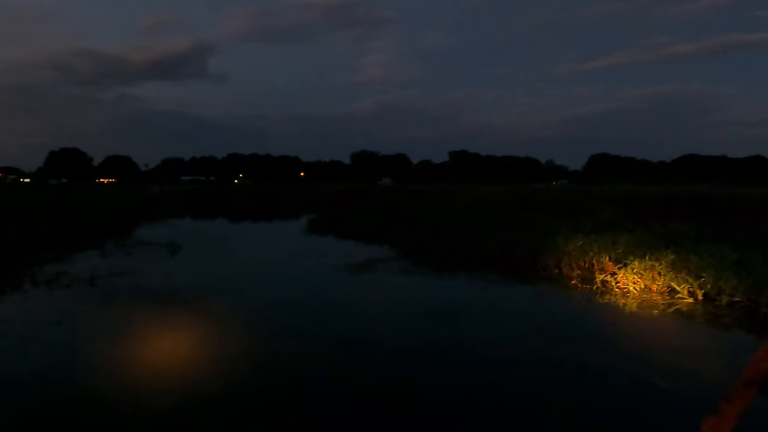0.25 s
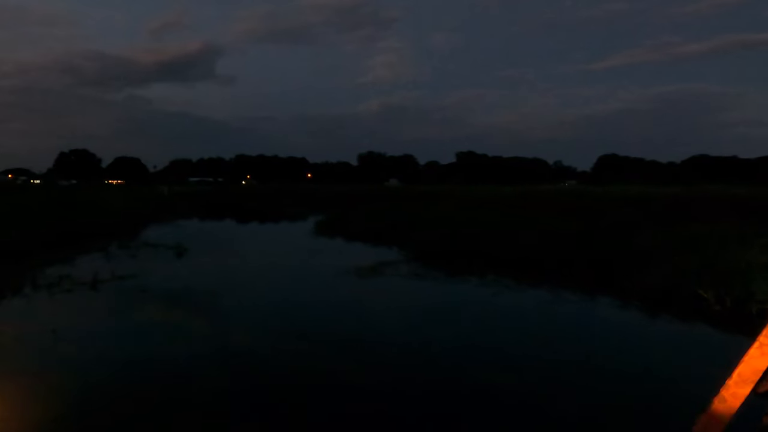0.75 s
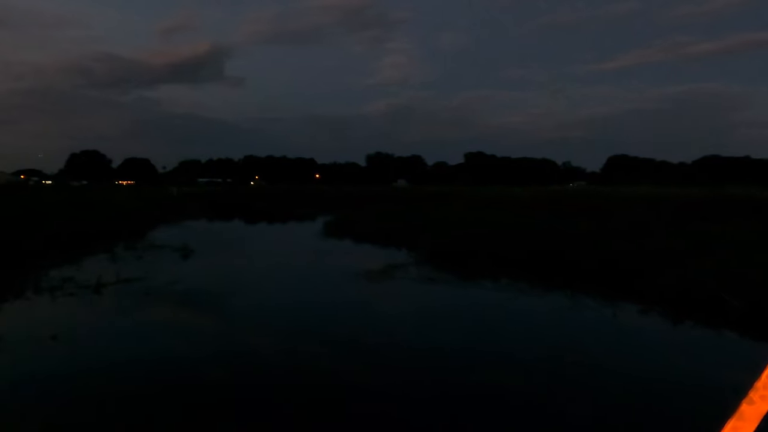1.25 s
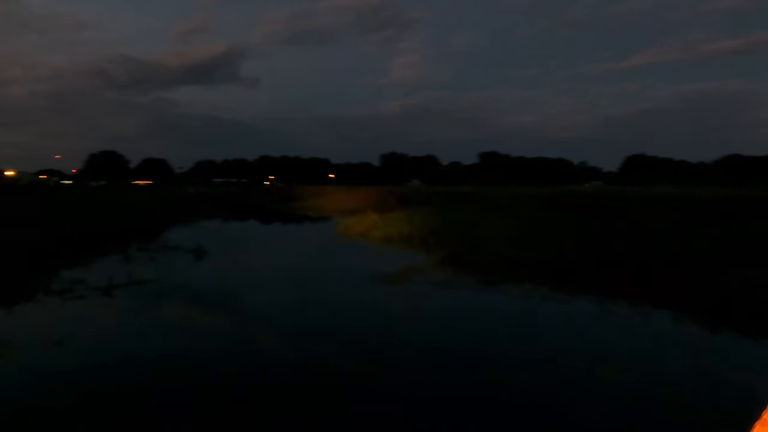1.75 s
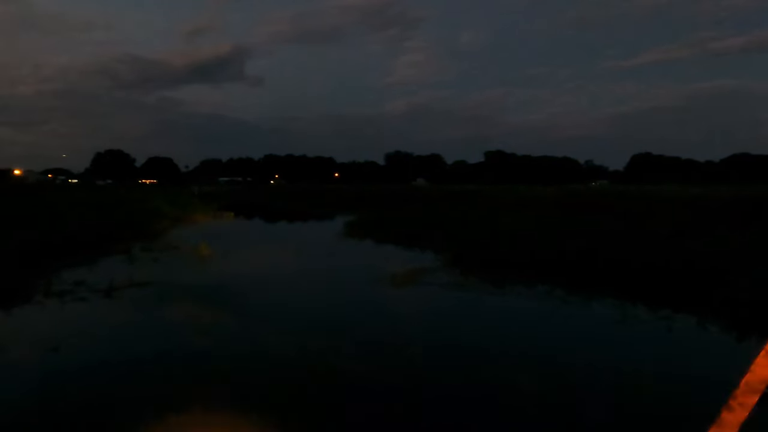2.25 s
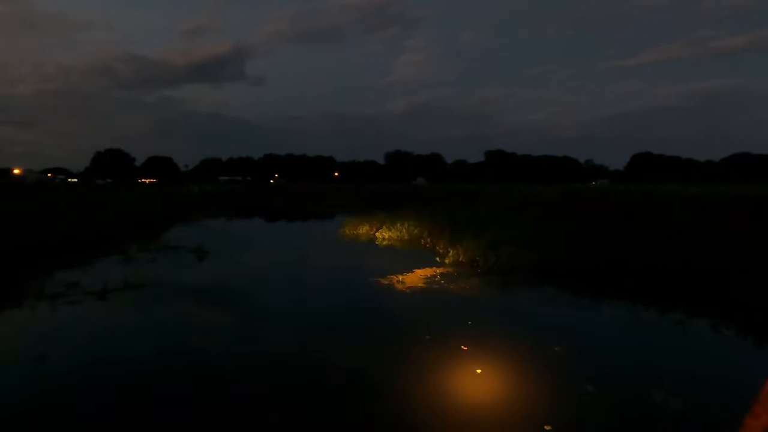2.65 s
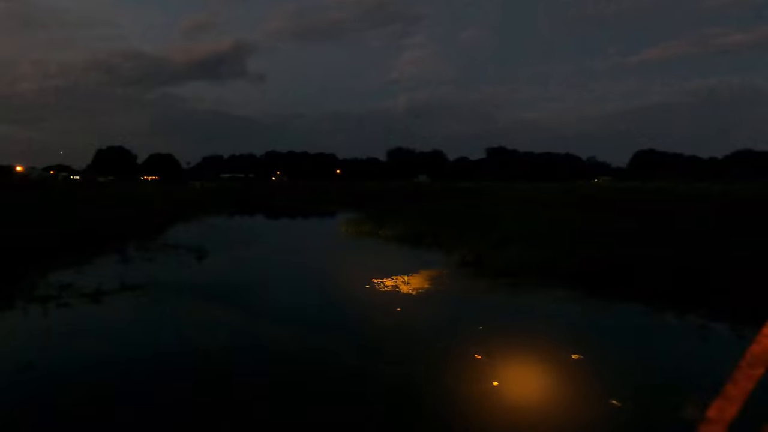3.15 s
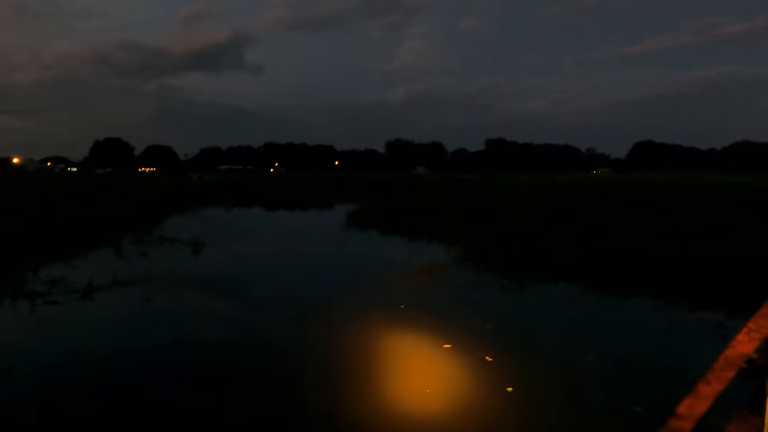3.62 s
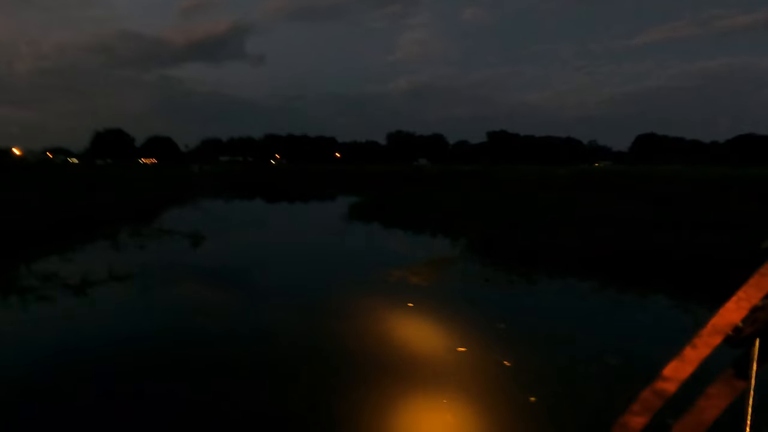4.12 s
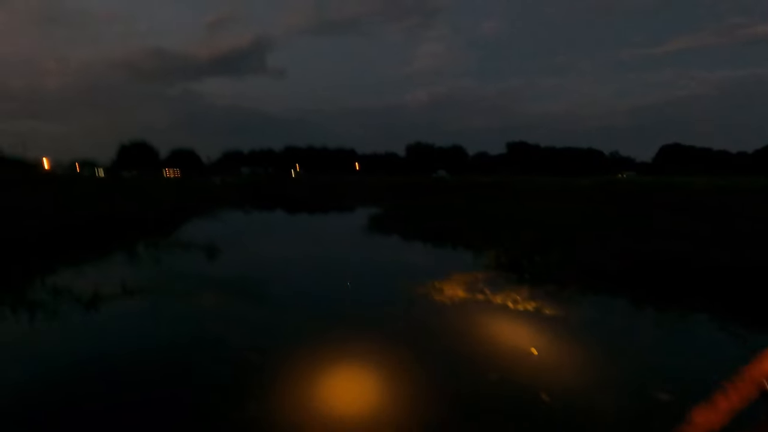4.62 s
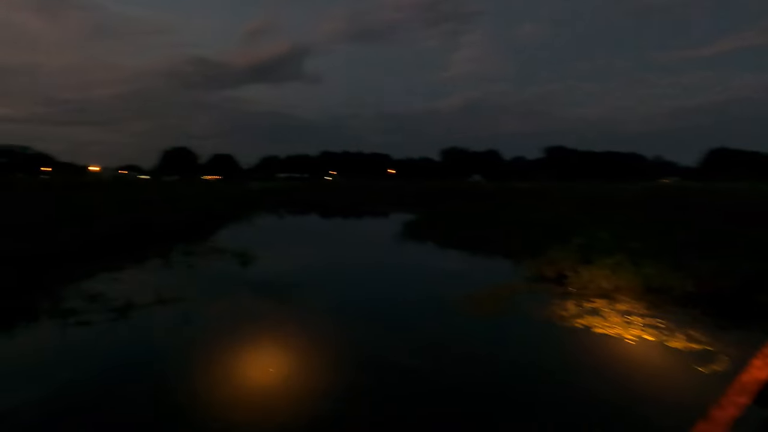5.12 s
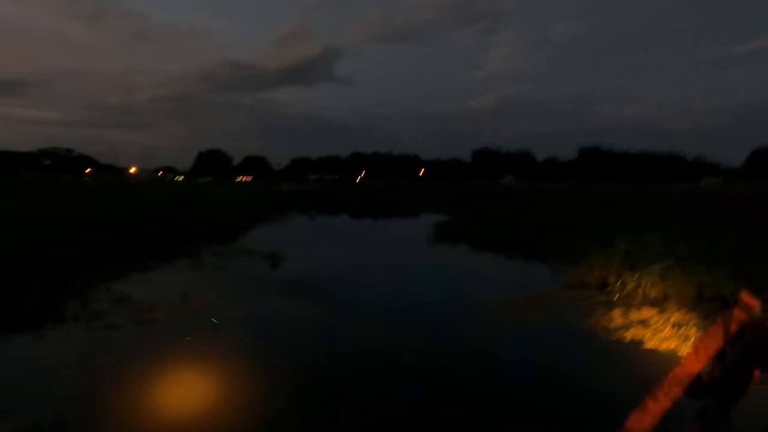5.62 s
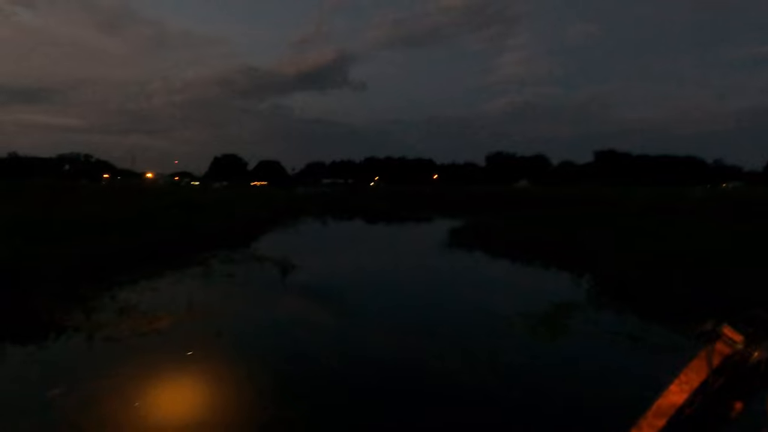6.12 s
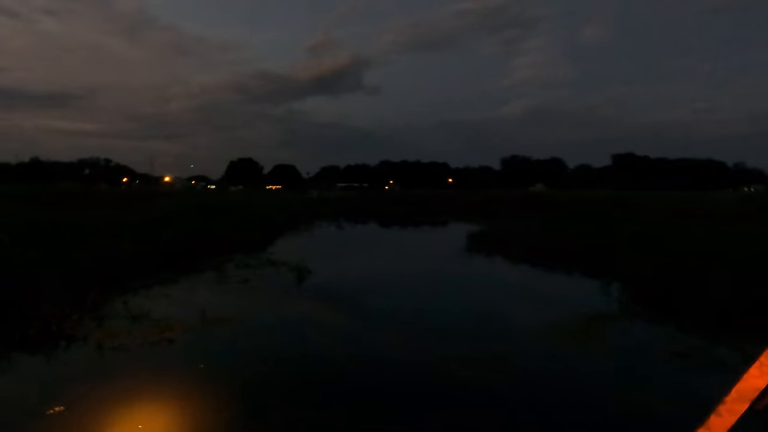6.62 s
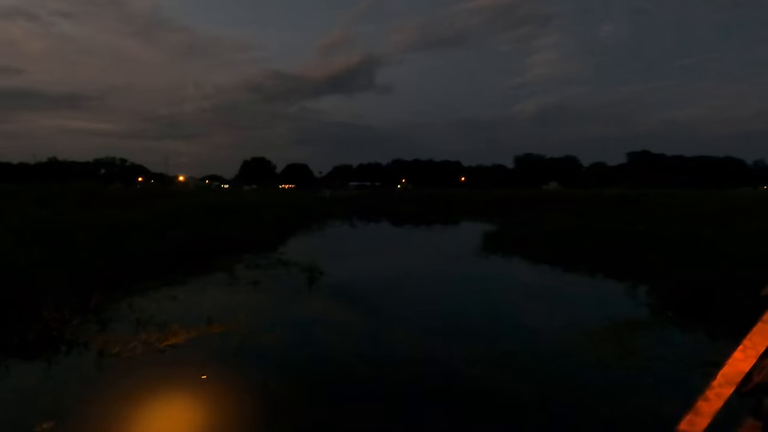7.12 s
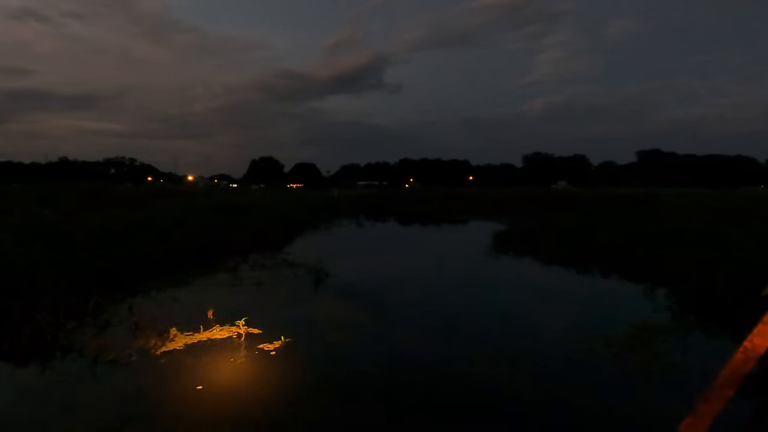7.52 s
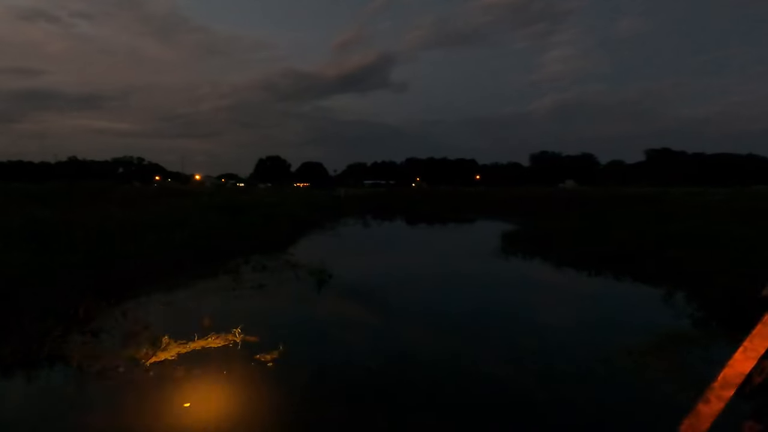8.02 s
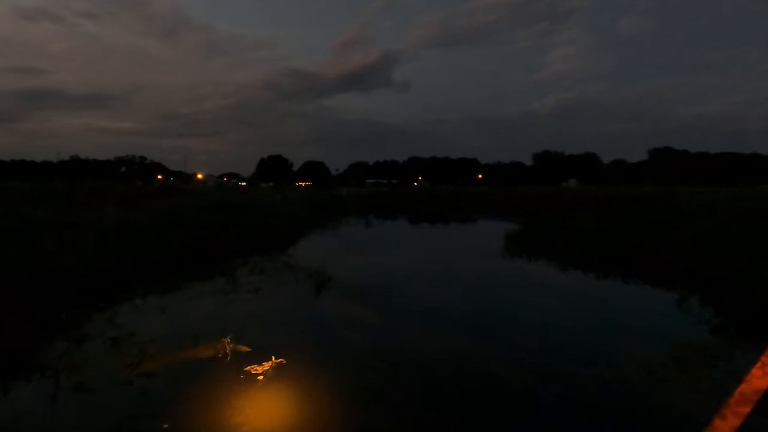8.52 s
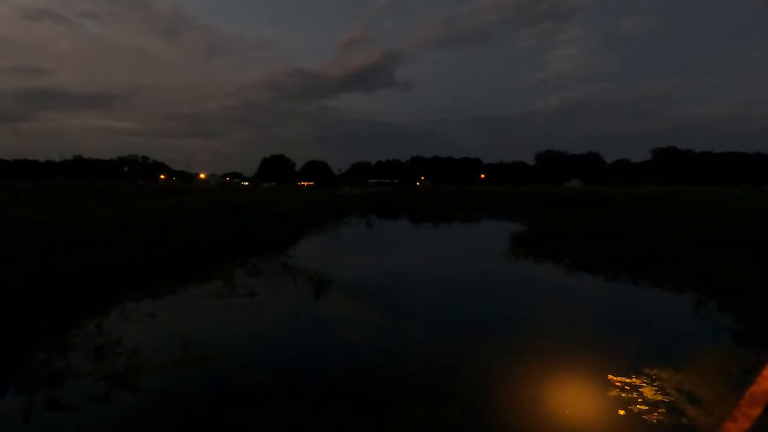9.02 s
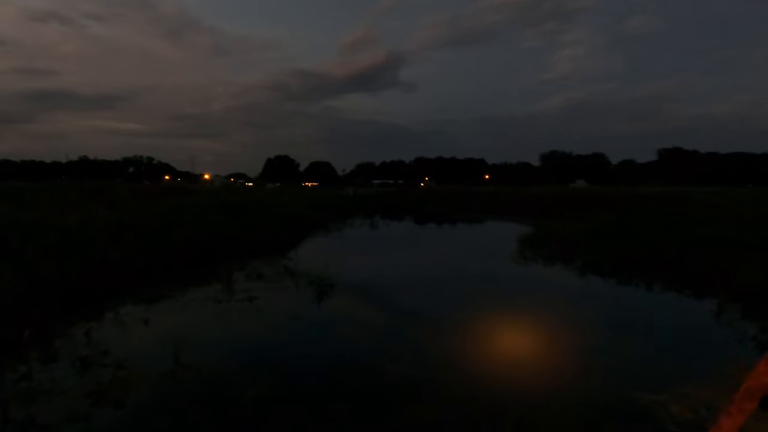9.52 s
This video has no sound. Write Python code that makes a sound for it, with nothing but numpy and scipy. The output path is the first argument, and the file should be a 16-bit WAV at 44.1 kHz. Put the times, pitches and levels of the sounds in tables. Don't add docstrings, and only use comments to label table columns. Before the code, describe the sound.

Deep steady V-eight boat engine drone over open water at dusk, hull ringing and rattling, soft water wash and faint shrill insects.

```python
import sys
import numpy as np
from scipy import signal
from scipy.fft import rfft, irfft, next_fast_len
from scipy.io import wavfile
from scipy.ndimage import uniform_filter1d

SR = 44100
rng = np.random.default_rng(int(sys.argv[2]) if len(sys.argv) > 2 else 0)


def undo_db(level):
    steps = np.asarray(level, float) / 20
    return 10 ** steps


def waveform_to_disk(signal):
    frames = np.transpose(np.atleast_2d(signal))
    scaled = np.clip(frames, -1, 1) * 32767
    samples = np.round(scaled).astype(np.int16)
    wavfile.write(sys.argv[1], SR, samples)


N = 429975
USUAL_RATE = 43.5

# (time [s], rate [firings per second])
ENGINE_SPEED = [(0.0, 44.19), (0.92, 43.89), (1.22, 44.29), (1.36, 43.87), (2.66, 43.44), (2.8, 43.49),
                (3.65, 42.05), (4.09, 43.15), (4.77, 43.7), (5.6, 43.56), (5.74, 42.95), (6.36, 42.65),
                (6.97, 43.83), (7.81, 43.17), (7.91, 43.94), (8.84, 42.86), (8.96, 43.39), (9.75, 43.48)]
# (strength [dB], travel down the header [ms])
CYLINDERS = [(0.7, 6.4), (-1.0, -0.13), (0.1, 8.63), (-1.1, 5.73), (-1.3, 7.09), (5.9, 7.72), (-4.8, 5.94),
             (1.5, 7.6)]
# (pitch [Hz], width [Hz], gain [signed])
PIPES = [(69.06, 5, -.047), (105.7, 26.4, -.336), (114.55, 27.7, .371)]
THROB = [(1, .168), (2, -.147)]
# (time [s], strength [dB])
STUMBLES = [
    (1.70, -6),
    (3.55, -10),
    (3.575, -7),
    (5.2, -4),
    (7.50, -6),
]
# (pitch [multiple of engine cycle], level [dB rms])
ROCKING = [(2, -54), (3, -48), (4, -52), (5, -43), (6, -47), (10, -47), (25, -50), (26, -52), (32, -52)]
# (pitch [multiple of engine cycle], level [dB rms], wobble [share], gain [dB per extra firing a second])
GEARS = [(35.4, -60.5, 0.11, -1), (39.95, -56.5, 0.2, -3), (41.97, -57, 0.93, 3),
         (48.24, -57.5, 0.22, -0.5), (50.04, -41, .16, 7), (55.54, -54, 0.45, -1), (66.3, -56.5, 0.47, 4),
         (68.15, -50, 0.99, 0.5), (69.86, -49, 0.46, 9), (88.6, -62, 0.55, -2.5), (100.2, -58, 0.61, -7),
         (101, -60.5, 0.93, -9), (110.2, -60.5, 0.24, 3), (116.7, -59.5, 0.24, 11.5),
         (149.3, -63.5, 0.32, 8), (158.8, -59, 0.14, 10.5), (194, -67.5, 0.24, -5), (243.5, -73, .3, -2),
         (338.4, -73, .3, -3.5)]
GEAR_LOAD = [(1, .25, .03), (.25, .3, .92)]
# (pitch [Hz], level [dB per Hz])
ROAR_COLOUR = [(82, -24.5), (140, -6), (183, -21.5), (280, -13), (435, -21), (592, -22), (717, -23.5),
               (852, -24), (957, -32.5), (3340, -47.5), (6920, -61), (11000, -84.5), (13800, -87)]
# (pitch [Hz], width [Hz], level over the roar [dB])
HULL = [(212, 21, 3.5), (276, 110, 5), (380, 20, 5.5), (511, 71, 5), (599, 21, 9.5), (648, 14, 4),
        (780, 3.6, 3), (862, 6.5, 5.5), (1062, 170, 7.5), (1230, 70, -5), (1357, 91, 5.5), (683, 30, -2.5),
        (950, 60, -1), (1830, 29, -4), (1510, 28, -6), (1840, 34, 0.5), (2020, 30, -1), (2010, 68, -5.5),
        (2260, 97, 2), (2750, 110, 4.5), (3340, 390, 1.5), (3800, 560, 2)]
# (pitch [multiple of engine cycle], level [dB])
CHATTER = [(345, -9), (248.4, -9.5), (249.3, -6.5), (258, -10.5), (384, -13.5)]
CHATTER_DB = [3, -1, -8, -3, 2, -3, -8, -1.5]
# (pitch [Hz], level [dB], steady ringing between firings [times burst
CAGE = [(1134, 2, 1.5), (1641, 1, .3), (1684, 6, .5), (2090, -9, .3), (2226, -5, .6), (2320, -10, .3)]
# (time [s], shaking [dB])
LOOSENESS = [(0, -63), (.1, -70), (3.0, -69), (3.8, -70), (4.5, -60), (5.65, -63.5), (5.8, -69),
             (6.5, -66.5), (6.65, -56.5), (7.6, -57.5), (8.5, -59), (9.3, -57.5), (9.75, -59.5)]
# (time [s], nearness [0-1])
NEARNESS = [
    (0, 0.3),
    (1.0, 0.1),
    (3.2, 0),
    (4.3, 0.5),
    (5.3, 0.6),
    (6.3, 0.7),
    (6.7, 0.7),
    (7.9, 0.94),
    (9.75, .95),
]
# (pitch [Hz], level [dB per Hz])
WATER_COLOUR = [(180, -30.5), (300, -14), (534, -8.5), (1230, -14), (1350, -6.5), (1510, -12.5), (1690, -8),
                (4160, -24.5), (5910, -28.5), (7170, -32), (13800, -48)]
# (pitch [Hz], width [Hz], level [dB], lean to the left [share])
INSECTS = [(6920, 900, -1, .55), (12300, 1200, -15.5, .8)]
# (time [s], level [dB], length [s], splash over the usual [dB])
WAVELETS = [(0.039, -57, 0.046, -5.5), (0.18, -57.5, 0.03, 1), (1.076, -57, .03, -3.5),
            (1.453, -58, .02, -8.5), (1.775, -58.5, .015, -7), (1.933, -58.5, 0.027, -9),
            (4.105, -64, 0.06, 1.5), (4.722, -62.5, 0.025, -3.5), (5.508, -62, 0.02, -2),
            (6.012, -63, 0.02, 0.5), (7.406, -62.5, 0.024, 4), (7.635, -63, 0.023, 3),
            (7.877, -51, 0.035, -3.5), (8.078, -51.5, 0.035, -3), (8.317, -56, 0.027, -1),
            (8.603, -54.5, 0.024, -1), (9.687, -60.5, 0.036, 1)]
# (pitch [Hz], level [dB per Hz])
SLAP_COLOUR = [(150, -18.5), (300, 3.5), (450, 0.5), (700, -19.5), (1500, -13.5), (3000, -23.5),
               (5000, -40.5), (14000, -71.5)]
# (time [s], level [dB])
TICKS = [(1.702, -65), (1.713, -62.5), (2.277, -61), (3.948, -59), (4.258, -64.5), (4.406, -60),
         (5.262, -63), (5.742, -56), (5.87, -59), (6.11, -62), (6.169, -60.5), (6.72, -64), (7.88, -62),
         (8.089, -60)]
# (time [s], length [s], pitch [Hz], level [dB])
PEEPS = [
    (5.505, .07, 2800, -58),
    (5.52, .055, 2400, -57),
    (6.03, .05, 2300, -58),
]
# (pitch [Hz], share lost from mid [0-1], share lost from side [0-1])
DROPPED = [(4900, 0, 0), (5500, .03, .6), (6500, .03, .7), (6950, 0, .05), (8000, .05, .3), (9000, .25, .6),
           (10400, .5, .6), (11200, .4, .3), (11700, .08, .1), (12700, .08, .1), (13300, .5, .4),
           (14000, .85, .85)]


def read(points, hz):
    f, value = np.transpose(points)
    return np.interp(np.log(hz + 1), np.log(f + 1), value)


def evened(x):
    return x / np.sqrt(np.mean(x ** 2) + 1e-20)


def curve(table, column):
    rows = np.array(table)
    return np.interp(np.arange(N) / SR, rows[:, 0], rows[:, column])


def peak(hz, centre_hz, width):
    return 1 / (1 + 2j * (hz - centre_hz) / width) + 1 / (1 + 2j * (hz + centre_hz) / width)


def filtered(x, response):
    size = next_fast_len(N + SR)
    hz = np.fft.rfftfreq(size, 1 / SR)
    gain = np.interp(hz, hz[::8], response(hz[::8]))
    return irfft(rfft(x, size) * gain, size)[..., :N]


def drift(rate_hz):
    hz = np.fft.rfftfreq(4096, 128 / SR)
    coarse = irfft(rfft(rng.standard_normal(4096)) * np.exp(-(hz / rate_hz) ** 2))
    return np.interp(np.arange(N) / 128, np.arange(4096), evened(coarse))


def noise(colour_db, patchy_db, flicker_db):
    frames, hz = N // 256 + 5, np.fft.rfftfreq(1024, 1 / SR)
    a, b, c, d, patches = rng.standard_normal((frames, 513, 5)).T
    patches = uniform_filter1d(patches, size=14, axis=0)
    patches = evened(uniform_filter1d(patches, size=12, axis=1))
    flicker = evened(uniform_filter1d(rng.standard_normal(frames), size=6))
    level_db = colour_db(hz)[:, None] + patchy_db * patches + flicker_db * flicker
    z = np.array([a + 1j * b, c + 1j * d]) * undo_db(level_db)
    return evened(signal.istft(z, nperseg=1024, noverlap=768)[1][:, :N])


def placed(pair, lean, spread):
    return np.array([pair[0], lean * pair[0] + spread * pair[1]])


def delayed(x, ms):
    return filtered(x, lambda hz: np.exp(-2j * np.pi * hz * ms / 1000))


def passing(far_db, gain_db, wander_db, wander_hz):
    return far_db + gain_db * curve(NEARNESS, 1) + wander_db * drift(wander_hz)


def firing_train(firings, size, late_s):
    count = np.arange(len(size)) - 1
    at = np.interp(count, firings, np.arange(N), left=-SR * .015)
    at = np.clip(at + late_s * SR, 0, N - 2)
    train = np.zeros(N)
    np.add.at(train, at.astype(int), size * (1 - at % 1))
    np.add.at(train, at.astype(int) + 1, size * (at % 1))
    return train


def order_tone(firings, order, wobble, wobble_hz):
    turn = 2 * np.pi * (order * firings / 8 + rng.random())
    sway = (1 + wobble * drift(wobble_hz)) * np.cos(turn)
    sway = sway - wobble * drift(wobble_hz) * np.sin(turn)
    return sway * np.sqrt(2 / (1 + 2 * wobble ** 2))


def exhaust(firings):
    uneven_db, uneven_ms = 1.2, .22
    muffler_hz = 60
    count = np.arange(-1, int(firings[-1]) + 1)
    strength_db, travel_ms = np.array(CYLINDERS)[count % 8].T
    chance = rng.standard_normal((len(count), 2))
    strength_db = strength_db + uneven_db * chance[:, 0]
    travel_ms = travel_ms + uneven_ms * chance[:, 1]
    speed = curve(ENGINE_SPEED, 1)
    throb_db = 0.13 - 0.45 * (speed - USUAL_RATE)
    for s, db in STUMBLES:
        strength_db[int(firings[round(s * SR)]) + 1] += db
        throb_db += .06 * db * np.exp(-((np.arange(N) / SR - s) / .03) ** 2)
    puffs = firing_train(firings, undo_db(strength_db) * SR / 10.88, travel_ms / 1000)

    def pipe_response(hz):
        ringing = sum(gain * peak(hz, f, width) for f, width, gain in PIPES)
        return ringing / (1 + 1j * hz / muffler_hz) ** 4

    pipes = filtered(puffs, pipe_response)
    pipes = filtered(pipes, lambda hz: 1 + .32 * abs(peak(hz, 126, 22)) ** 2)
    brighter_db = 2.0 * (uniform_filter1d(speed, size=20000) - USUAL_RATE)
    throb = sum(height * undo_db(throb_db + (k - 1) * brighter_db) * np.cos(2 * np.pi * k * firings)
                for k, height in THROB)
    return pipes + throb


def shaft_tones(firings):
    faster = uniform_filter1d(curve(ENGINE_SPEED, 1), size=12000) - USUAL_RATE
    faster = np.minimum(faster, .15)
    rocking = sum(undo_db(db) * order_tone(firings, k, 0.58, 2.4) for k, db in ROCKING)
    load = 1 + sum(depth * np.cos(2 * np.pi * (k * firings - lag)) for k, depth, lag in GEAR_LOAD)
    gears = sum(undo_db(db + slope_db * faster) * order_tone(firings, k, wobble, 13)
                for k, db, wobble, slope_db in GEARS)
    return rocking + load * gears


def hull_rings(hz):
    return np.prod([1 + (undo_db(db) - 1) * abs(peak(hz, f, width)) ** 2 for f, width, db in HULL], axis=0)


def roar():
    rush = noise(lambda hz: read(ROAR_COLOUR, hz), patchy_db=0.96, flicker_db=0.96)
    return undo_db(-42) * evened(filtered(rush, hull_rings))


def rattle(firings):
    count = int(firings[-1])
    knock_db = 1.5 * rng.standard_normal(count)
    knock_db = knock_db + np.array(CHATTER_DB)[np.arange(-1, count - 1) % 8]

    def bursts(samples, share, late_s):
        clicks = firing_train(firings, undo_db(share * knock_db), late_s)
        return evened(signal.oaconvolve(clicks, signal.windows.hann(samples), "same"))

    short = bursts(900, 1, late_s=.011)
    long = bursts(1050, .75, late_s=.0045)
    teeth = sum(undo_db(db) * order_tone(firings, k, 0.18, 24) for k, db in CHATTER)
    teeth = evened((.15 + short) * teeth)
    teeth_db = passing(far_db=-66.5, gain_db=5, wander_db=2.8, wander_hz=1.5) - 4
    teeth_db = teeth_db + 1.5 * (curve(ENGINE_SPEED, 1) - 44.0)
    clock = np.cumsum(1 + .004 * drift(6)) * 8 / SR
    bars = sum(undo_db(db) * (steady + long) * order_tone(clock, hz, .22, 25) for hz, db, steady in CAGE)
    bars_db = curve(LOOSENESS, 1) + 0.9 + .4 * drift(3)
    return undo_db(teeth_db) * teeth + undo_db(bars_db) * evened(bars)


def water():
    drops = undo_db(6.9 * np.minimum(rng.exponential(1, (2, N)), 4))
    drops = drops * (rng.random((2, N)) < 900 / SR)
    fizz = evened(filtered(drops, lambda hz: undo_db(read(WATER_COLOUR, hz)) * hz / (hz + 5000)))
    wash = noise(lambda hz: read(WATER_COLOUR, hz), patchy_db=0.81, flicker_db=0.2) + 0.06 * fizz
    top = filtered(wash, lambda hz: 1 / (1 + (7500 / (hz + 1)) ** 6))
    wash = wash + top * (undo_db(1.5 * drift(25) - 1.0) - 1)
    level_db = passing(far_db=-63, gain_db=4, wander_db=0.85, wander_hz=0.5) + 4.5
    return undo_db(level_db) * filtered(wash, lambda hz: hull_rings(hz) ** .5)


def placed_water(wash):
    wide = filtered(.4 * wash[0] + .9 * wash[1], lambda hz: .2 + .8 / (1 + (hz / 5200) ** 12))
    return np.array([wash[0], wide])


def insects():
    chorus = 0
    for f, width, db, lean in INSECTS:
        band = noise(lambda hz: 40 * np.log10(abs(peak(hz, f, width)) + 1e-5), patchy_db=1.2, flicker_db=1.5)
        chorus = chorus + undo_db(db) * placed(band, lean, .8)
    return undo_db(passing(far_db=-83, gain_db=12.5, wander_db=1.0, wander_hz=3.5)) * chorus


def slaps():
    t = np.arange(N) / SR
    thump_swell, splash_swell = np.zeros(N), np.zeros(N)
    for s, db, length, splash_db in WAVELETS:
        u = np.maximum(t - s, 0) / length
        swell = undo_db(db + 12.5) * u * np.exp(1 - u)
        thump_swell += swell
        splash_swell += undo_db(splash_db) * swell
    both = noise(lambda hz: read(SLAP_COLOUR, hz), patchy_db=0.75, flicker_db=1.4)
    thump = filtered(both, lambda hz: 1 / (1 + (hz / 800) ** 4))
    return thump_swell * thump + splash_swell * (both - thump)


def spray():
    out, t = np.zeros((2, N)), np.arange(400) / SR
    for s, db in TICKS:
        tick = rng.standard_normal((2, 400)) * np.exp(-t / 0.003)
        out[:, round(s * SR):][:, :400] += undo_db(db) * tick
    return filtered(out, lambda hz: 1.8 * peak(hz, 4800, 2500) + .12)


def peeps():
    out = np.zeros(N)
    for s, length, hz, db in PEEPS:
        t = np.arange(0, length, 1 / SR)
        whistle = np.sin(np.pi * t / length) * np.sin(2 * np.pi * hz * t)
        out[round(s * SR):][:len(t)] += undo_db(db) * whistle
    return out


def scene():
    firings = -.335 + np.cumsum(curve(ENGINE_SPEED, 1)) / SR
    low, tones = exhaust(firings), shaft_tones(firings)
    chatter = rattle(firings)
    mix = placed([low, delayed(low, 2.5)], 0.019, 0.013)
    mix = mix + placed([tones, delayed(tones, 1.2)], 0.054, 0.092)
    mix = mix + placed(roar(), .06, .12)
    mix = mix + placed([chatter, delayed(chatter, .25)], .35, .35)
    mix = mix + placed_water(water())
    mix = mix + insects()
    mix = mix + placed(slaps(), 0, .25)
    mix = mix + placed(spray(), .2, .3)
    mix = mix + np.outer([1, .3], peeps())
    mid, side = mix
    return np.array([mid + side, mid - side])


def dropped(pair):
    hz, _, z = signal.stft(pair, SR, nperseg=1024, noverlap=768)
    field = rng.standard_normal((2, z.shape[2], 66)).transpose(0, 2, 1)
    shared = evened(uniform_filter1d(field[:, :1], size=7, axis=2))
    field = evened(uniform_filter1d(field, size=7, axis=2)) + .7 * shared
    rank = 1 / (1 + np.exp(-1.4 * np.repeat(field, 8, axis=1)[:, :513]))
    share = np.array([read([(row[0], row[k]) for row in DROPPED], hz) for k in (1, 2)])[:, :, None]
    kept = z * (rank > share) / np.sqrt(1 - .8 * share)
    return signal.istft(kept, SR, nperseg=1024, noverlap=768)[1][:, :N]


def roll_off(x):
    return signal.sosfilt(signal.butter(12, 13980, fs=SR, output="sos"), x)


def record(dry):
    overload, widens_s = .3, 1.9
    over = np.maximum(abs(dry) - overload, 0)
    squeezed = dry - np.sign(dry) * (over - .12 * np.tanh(over / .12))
    mid, side = (squeezed[0] + squeezed[1]) / 2, (squeezed[0] - squeezed[1]) / 2
    t = np.arange(N) / SR
    width = .004 + np.clip((t - widens_s) / (t[-1] - widens_s), 0, 1) ** 0.46
    hiss = filtered(side, lambda hz: 1 / (1 + (11600 / (hz + 1)) ** 24))
    side = width * side + .6 * (1 - width) * hiss
    mid, side = dropped(np.array([mid, side]))
    x = np.array([mid + side, mid - side])
    x = x * np.minimum(t / .003, 1) + .0045
    return roll_off(x)


dry = scene()
out = record(dry)
waveform_to_disk(out)
```